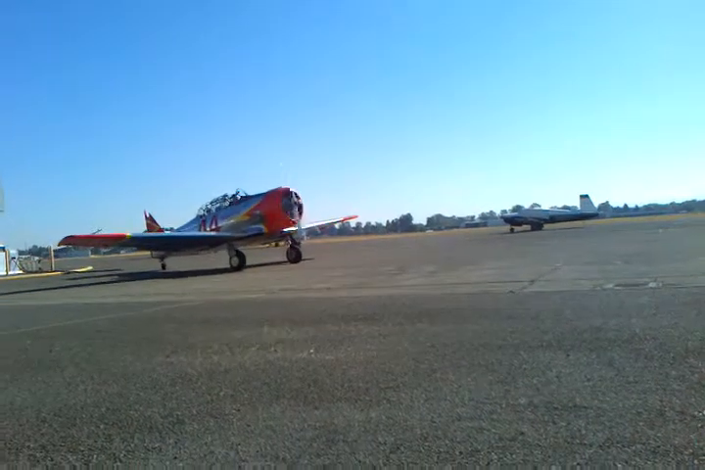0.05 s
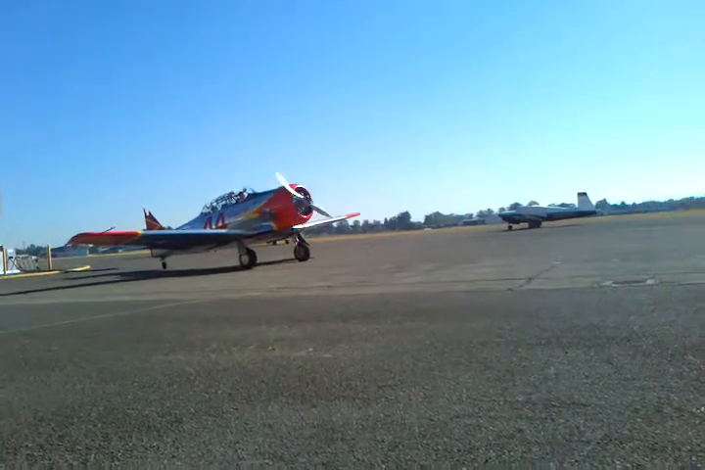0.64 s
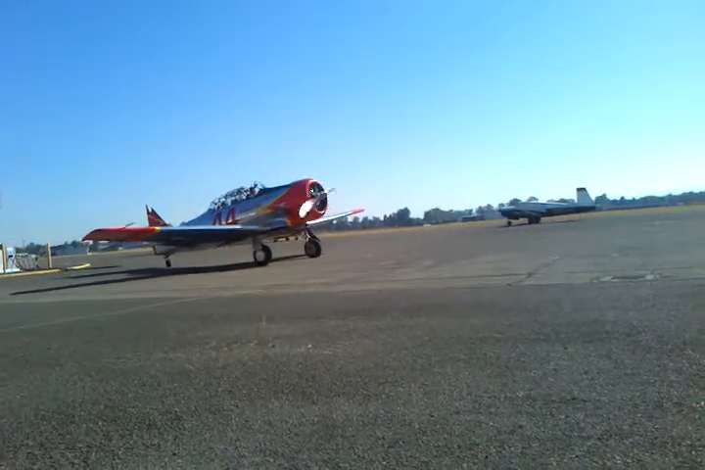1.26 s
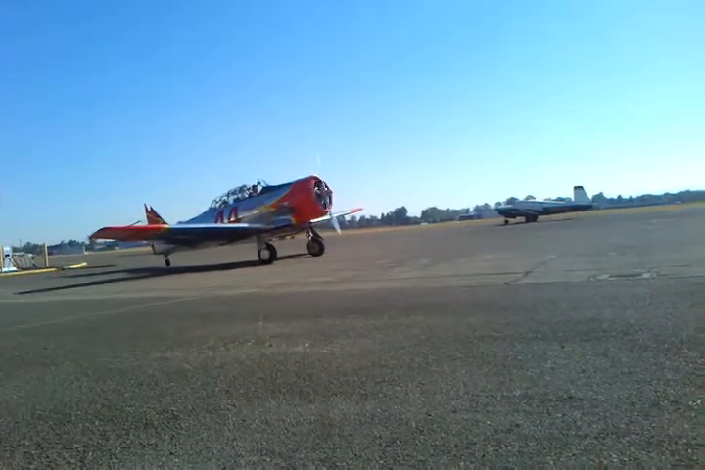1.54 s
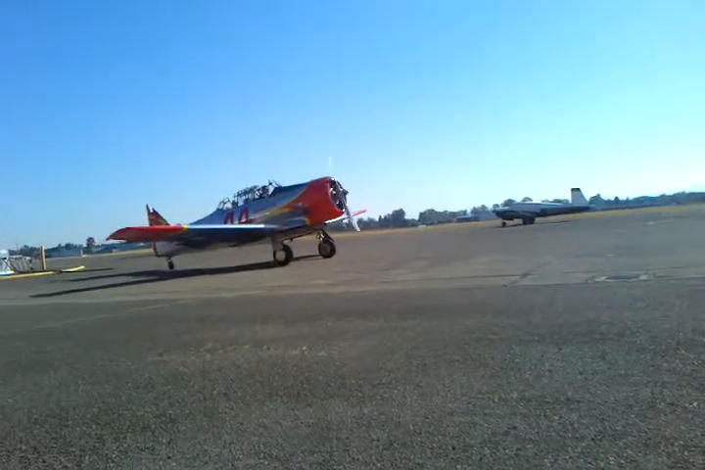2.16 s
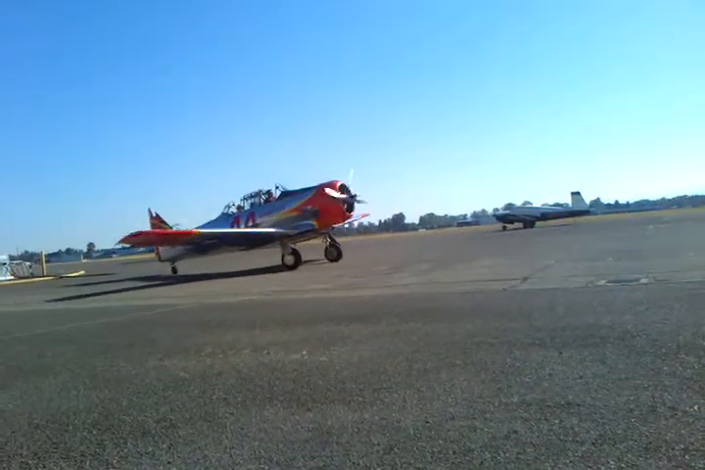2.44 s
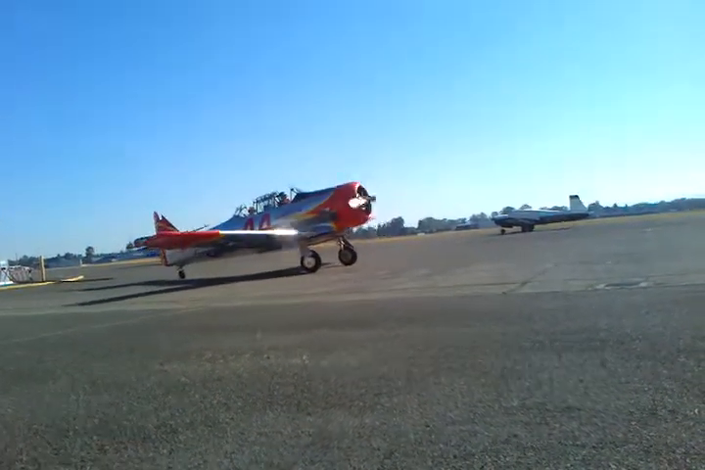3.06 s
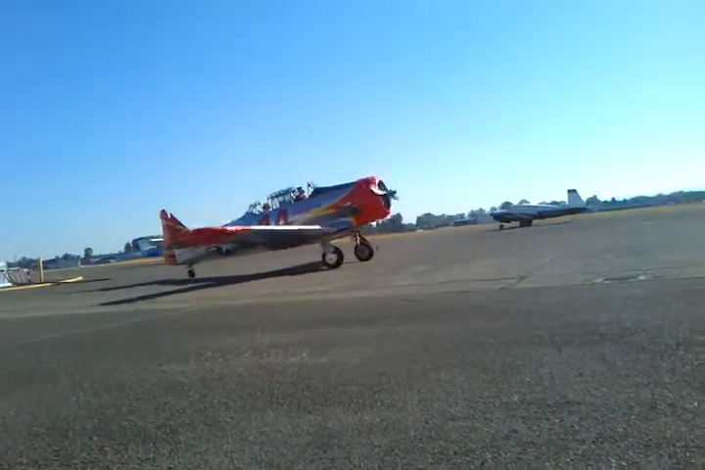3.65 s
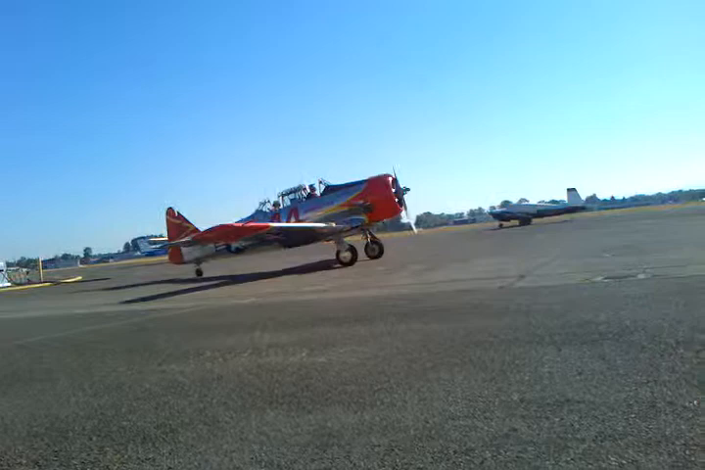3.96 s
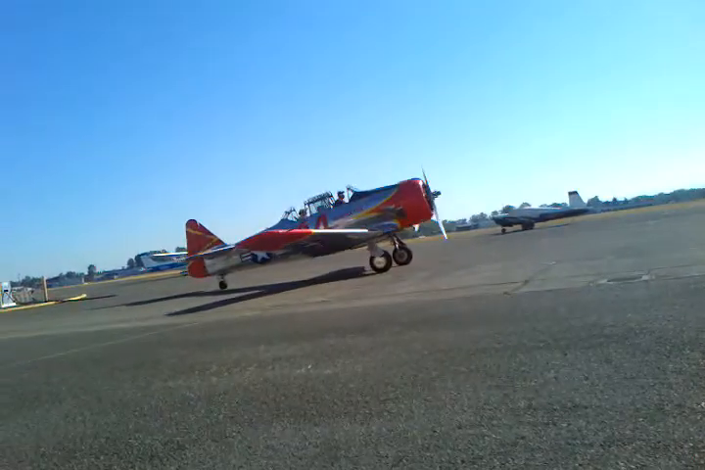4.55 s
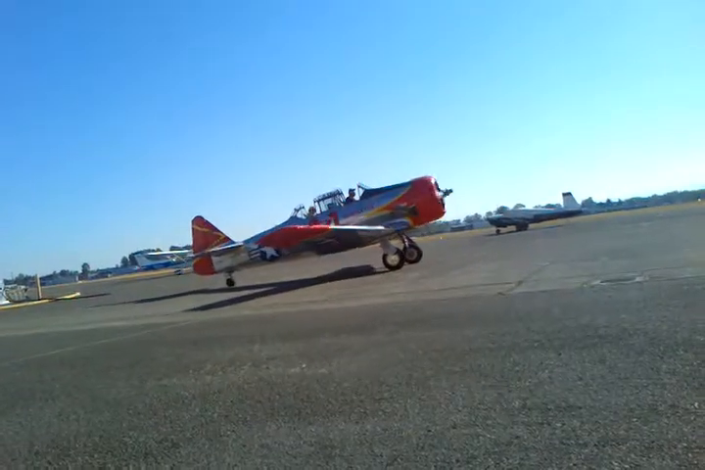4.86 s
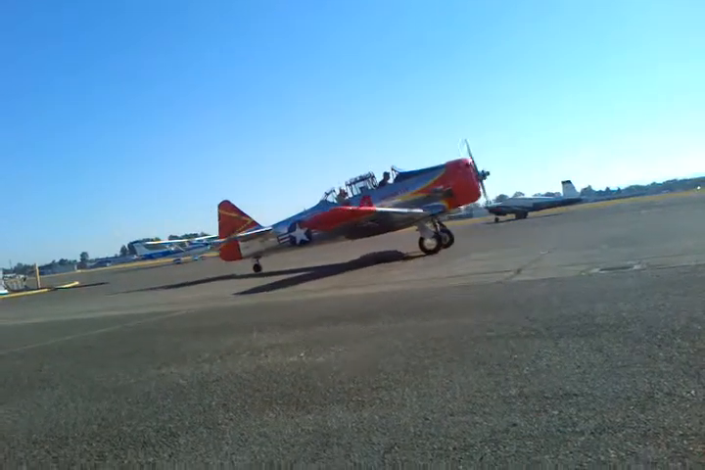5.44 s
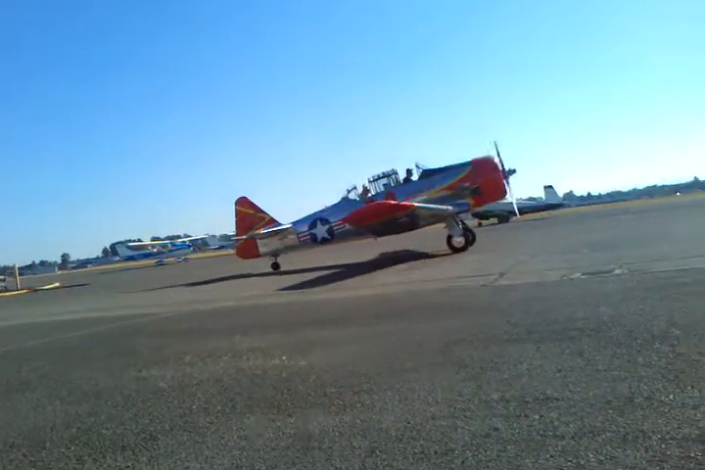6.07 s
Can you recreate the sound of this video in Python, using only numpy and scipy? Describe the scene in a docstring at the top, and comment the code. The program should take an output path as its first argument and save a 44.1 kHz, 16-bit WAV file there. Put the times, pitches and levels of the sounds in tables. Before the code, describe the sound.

The loping idle of a radial aircraft engine and a chopping propeller as a plane taxis by outdoors, under a bright hiss.

```python
"""A propeller plane taxis past on an open apron, some twenty metres away, its nine-cylinder radial idling.
At first the nose points nearly this way: the two blades swish, slap, chirp and briefly bark, while uneven
firings lope through the exhaust collector and rasp at its outlet. As the plane swings round, the blades
recede, the pipe changes colour and other valves tick through. Just past side-on the exhaust pops hardest.
A bright hiss lies on top throughout, and a hand-held recorder widens the stereo image."""
import sys
import numpy as np
from scipy import signal
from scipy.fft import rfft, irfft
from scipy.io import wavfile
from scipy.ndimage import uniform_filter1d

SR = 44100
rng = np.random.default_rng(int(sys.argv[2]) if len(sys.argv) > 2 else 0)


def store_wav(level_fs):
    """Save 16-bit WAV to argv[1]."""
    pcm = np.round(np.clip(np.atleast_2d(level_fs), -1, 1) * 32767)
    wavfile.write(sys.argv[1], SR, pcm.T.astype(np.int16))


N = 277830
TIME = np.arange(N) / SR

# One engine cycle in firing order. Each row: a cylinder's strength in dB and lag behind an even beat
# in ms as heard from the front, then the same two from the side.
CYLINDER_FIRINGS = [(-3.9, 1.2, -5.4, -0.3), (0.3, 2.7, 0.4, 1.9), (4.9, 0.7, 5.6, 1.3),
                    (5.0, -0.1, -4.6, 1.5), (-1.7, -2.2, -0.8, -2.0), (-0.2, 0.2, -2.6, 0.1),
                    (-4.8, -0.8, 0.7, 1.2), (-3.7, 0.5, 4.8, 2.1), (3.3, -0.8, 1.1, -0.2)]
# The recorder's stereo widening. Each row: frequency in Hz, left minus right in dB, phase lead of the
# left in radians, likeness of the channels from 0 to 1.
STEREO_IMAGE = [(75, -2.3, -2.39, 0.993), (160, -2.4, -1.58, 0.961), (310, -3.4, -1.27, 0.885),
                (530, -7.8, -0.65, 0.467), (800, -2.5, -0.13, 0.734), (1100, -3.2, 0.3, 0.636),
                (1300, -0.5, 0.03, 0.971), (1550, 0.0, -0.0, 1.0), (1800, -0.1, -0.02, 0.967),
                (2150, -2.2, -0.43, 0.675), (2500, -6.2, -0.85, 0.13), (2800, -1.8, -2.88, 0.35),
                (3030, -0.2, -3.08, 0.985), (3170, -0.0, -3.14, 1.0), (3340, 0.3, -3.18, 0.985),
                (3650, 2.8, -3.47, 0.692), (3950, -0.3, -5.07, 0.088), (4300, 0.7, -6.34, 0.686),
                (4700, -0.2, -6.27, 0.726), (5100, -0.2, -6.33, 0.633), (5500, -2.6, -4.99, 0.085)]


def undb(db):
    """Decibels to gain."""
    return 10 ** (np.asarray(db) / 20)


def unit(x):
    """Scale to an rms of 1."""
    return x / np.sqrt(np.mean(x ** 2))


def curve(points):
    """Join (seconds, value) points with straight lines."""
    return np.interp(TIME, *np.transpose(points))


def over_bins(table):
    """Each column of a table in frequency, joined on a log axis."""
    hz, *columns = np.transpose(table)
    bins = np.maximum(np.arange(N // 2 + 1) * SR / N, 1)
    return [np.interp(np.log(bins), np.log(hz), column) for column in columns]


def colour(x, outline):
    """Causal filter with the given (Hz, dB) outline; the result has an rms of 1."""
    cepstrum = irfft(np.log(undb(over_bins(outline)[0])), N)
    cepstrum[1:N // 2] *= 2
    cepstrum[N // 2 + 1:] = 0
    return unit(irfft(rfft(x) * np.exp(rfft(cepstrum)), N))


def band(x, low_hz, high_hz):
    """Steep band-pass."""
    return signal.sosfilt(signal.butter(4, [low_hz, high_hz], "band", fs=SR, output="sos"), x)


def resonance(x, hz, width_hz):
    """One resonance with a gain of 1 at its centre."""
    return signal.lfilter(*signal.iirpeak(hz, hz / width_hz, fs=SR), x)


def ring(x, hz, width_hz):
    """The same resonance twice over; the result has an rms of 1."""
    return unit(resonance(resonance(x, hz, width_hz), hz, width_hz))


def walk(rate):
    """Random levels held 1 / rate s and slewed; spread near 1."""
    hold = int(SR / rate)
    return unit(uniform_filter1d(rng.standard_normal(N)[np.arange(N) // hold], hold))


def strikes(times, db):
    """One impulse of the given strength at each time."""
    at = np.round(times * SR).astype(int)
    inside = (at >= 0) & (at < N)
    return np.bincount(at[inside], undb(db)[inside], N)


def fade(impulses, decay_s):
    """Each impulse becomes a dying envelope."""
    return signal.lfilter([1], [1, -np.exp(-1 / (decay_s * SR))], impulses)


def noise_pair(likeness):
    """Two noises with the given likeness (-1 to 1) at each frequency."""
    mid, side = rfft(rng.standard_normal((2, N)))
    return irfft(mid * np.sqrt(1 + likeness) + np.array([[1], [-1]]) * side * np.sqrt(1 - likeness), N)


def turbulence():
    """Stereo noise, left and right alike in some bands and unrelated in others."""
    return noise_pair(over_bins(STEREO_IMAGE)[2])


def radiated(bearing, side_db, nose_db, tail_db):
    """Gain of a source at a bearing in degrees off the nose: its side-on level, changed fore and aft."""
    ahead = np.cos(np.radians(bearing))
    return undb(side_db + nose_db * np.maximum(ahead, 0) ** 1.5 + tail_db * np.maximum(-ahead, 0))


def firings(turns, scatter_db=0.7, jitter_ms=0.06):
    """Each cylinder fires once in two turns; unequal strengths and paths make the lope, front and side."""
    count = len(CYLINDER_FIRINGS)
    beat = np.arange(int(turns[-1] / 2 * count))
    front_db, front_ms, side_db, side_ms = np.array(CYLINDER_FIRINGS)[beat % count].T
    size, late = rng.standard_normal((len(beat), 2)).T
    times = np.interp(2 * beat / count, turns, TIME)
    return [strikes(times + (lag_ms + jitter_ms * late) / 1000, db + scatter_db * size)
            for db, lag_ms in ((front_db, front_ms), (side_db, side_ms))]


def pipe(pulses, outline):
    """Firings roll round the collector and ring the pipe."""
    # Notes the collector ring holds back. Each row: pitch in Hz, width in Hz.
    held_notes = [(100, 24), (193, 47), (255.5, 9.4)]
    for hz, width_hz in held_notes:
        pulses = pulses - 2 * resonance(pulses, hz, width_hz)  # all-pass: draws the thump into a roll
    return colour(band(pulses, 50, 4000), outline)


def exhaust(front, side, bearing, crossover_deg=75.2, width_deg=54):
    """The upper notes of the pipe come forward as the outlet swings round, and the hollow notes fade."""
    # The pipe's tone from the front and from the side. Each row: frequency in Hz, level in dB.
    front_tone = [(45, -29.5), (64, -12.5), (76, -3.5), (100, -17.5), (122, -17.5), (136, 3), (155, 4.5),
                  (185, -8), (205, -1.5), (221, -5.5), (238, -8), (260, -15), (320, -15.5), (365, -24.5),
                  (408, -23), (450, -38), (700, -33.5), (2000, -61)]
    side_tone = [(45, -14), (64, -12), (76, -8.5), (100, -6), (122, -5), (136, -4.5), (155, -6), (185, -4),
                 (203, -0.5), (219, 5), (237, 3), (280, -15), (320, -2), (361, -6.5), (430, -20.5),
                 (700, -37), (2000, -68)]
    # Hollow notes over the nose. Each row: pitch in Hz, width in Hz, opening level against the pipe
    # in dB, fade time in seconds.
    hollow_notes = [(456, 42, -10.5, 0.51), (317.8, 24, -12, 3.3)]
    hollow = sum(undb(db) * np.exp(-(TIME / fade_s) ** 2) * ring(front, hz, width_hz)
                 for hz, width_hz, db, fade_s in hollow_notes)
    side_on = (1 + np.tanh((bearing - crossover_deg) / width_deg / 2)) / 2
    return (1 - side_on) * pipe(front, front_tone) + side_on * pipe(side, side_tone) + hollow


def rasp(pulses, sputter_db=2.5, steady_flow=6.4):
    """Firings puff into a steady, sputtering stream of gas."""
    # The gritty midrange of the gas. Each row: frequency in Hz, level in dB.
    tone = [(60, -57), (200, -17.5), (330, -2.5), (400, -4), (470, -4), (560, -6.5), (800, -1.5),
            (980, -4.5), (1120, -14.5), (2000, -17.5), (5000, -48.5)]
    stream = steady_flow + unit(fade(np.sign(pulses), decay_s=0.0034))
    return colour(turbulence() * stream * undb(sputter_db * walk(260)), tone)


def burble(churn_db=1.0):
    """Spent gas churns evenly at the outlet and fills the gaps between the firings."""
    # The low body of the churn. Each row: frequency in Hz, level in dB.
    tone = [(50, -20.5), (80, -10.5), (140, -1.5), (200, -2.5), (275, 3), (330, -3.5), (420, -22.5),
            (900, -44)]
    return colour(turbulence() * undb(churn_db * walk(120)), tone)


def machinery(turns, chop_db=2.2, dip_turn=0.53, flutter_db=2.08):
    """Gears, valves and churned air make a rough rush that the blades chop lightly."""
    # The broad spread of the rush. Each row: frequency in Hz, level in dB.
    tone = [(30, -9), (60, 5), (400, 3), (1800, -7.5), (2200, 3), (2600, 0), (3000, -2.5), (3500, -2),
            (4200, -4.5), (5200, -8), (9000, -26.5)]
    pulse_db = -chop_db * np.cos(4 * np.pi * (turns - dip_turn))
    return colour(turbulence() * undb(pulse_db + flutter_db * walk(150)), tone)


def whine(turns, waver_db=6.5, wander_cycles=0.073):
    """Thin gear tones follow the crankshaft and waver."""
    # Each row: cycles per crankshaft turn, level in dB.
    gear_tones = [(28, -54), (42, -56)]
    out = np.zeros(N)
    for teeth, db in gear_tones:
        mesh = np.sin(2 * np.pi * (teeth * turns + wander_cycles * walk(5)))
        out += undb(db) * unit(mesh * undb(waver_db * walk(1.87)))
    return out


def swish(turns, bearing, depth_db=2.5, uneven_db=1.0, flutter_db=1.5, peak_turn=0.4):
    """Air tears off each blade as it sweeps towards the listener; one blade is a little louder."""
    # The airy tone of the blades. Each row: frequency in Hz, level in dB.
    tone = [(400, -26.5), (1000, -15), (1150, -1.5), (1300, 1), (1600, 0), (1900, -4.5), (2400, -7),
            (3100, -15.5), (3500, -5), (5000, -22), (9000, -41)]
    lag_turns = 0.051 * (1 - np.cos(np.radians(bearing)))  # the sweep comes later side-on than head-on
    angle = 2 * np.pi * (turns - lag_turns - peak_turn)
    sweep_db = depth_db * np.cos(2 * angle) + uneven_db * np.cos(angle)
    return colour(turbulence() * undb(sweep_db + flutter_db * walk(180)), tone)


def hiss(turns, bearing, lift_db=4, throb_db=0.5, gasp_db=1.0, flicker_db=1.0, grain_db=1.17):
    """A wide, bright hiss flickers in bands and throbs with the engine, gasping once a cycle side-on."""
    # The sheen on top. Each row: frequency in Hz, level in dB.
    tone = [(2000, -20), (3300, -99), (4500, -16), (6000, -11), (7200, -5.5), (8500, -2.5), (9900, 1),
            (10700, 3), (12000, 2.5), (13000, 3.5), (14000, 0)]
    # Its fader ride. Each row: time in seconds, level in dB before the lift.
    ride = [(0, -30), (1.4, -29), (1.95, -30.5), (2.3, -29.5), (3.6, -30), (4.5, -30), (5.1, -32),
            (5.4, -31), (6.3, -31.5)]
    angle = np.pi * (turns - 1.73)
    throb = np.cos(angle) + np.cos(2 * angle)
    gasp = np.exp(16 * (np.cos(np.pi * (turns - 1.88)) - 1)) * np.sin(np.radians(bearing)) ** 4
    # a stereo-widening comb makes the hiss alternately narrow and wide up the spectrum
    comb_hz, comb_depth = 3170, 0.35
    likeness = -comb_depth * np.cos(2 * np.pi * np.arange(N // 2 + 1) * SR / N / comb_hz)
    edges_hz = [2000, 6000, 9500, 12000, 16000]
    tail_shade_db = [0, -1, -4, -5]  # the top bands dull as the tail comes round
    noise = 0
    for low_hz, high_hz, tail_db in zip(edges_hz, edges_hz[1:], tail_shade_db):
        flicker = undb(flicker_db * walk(40) + grain_db * walk(300))
        shade = radiated(bearing, 0, 0, tail_db)
        noise = noise + band(noise_pair(likeness), low_hz, high_hz) * flicker * shade
    pulsing = noise * undb(throb_db * throb + gasp_db * gasp)
    return undb(curve(ride) + lift_db) * colour(pulsing, tone)


def valves(turns, bearing, cowl_deg=79, cowl_width_deg=16, scatter_db=0.2):
    """Each valve ticks once a cycle; the cowling hides some and uncovers others as the plane turns."""
    # Each row: place in the two-turn cycle in turns, ring in Hz, level in dB from the front, from behind.
    cycle_ticks = [(0.04, 2400, -42, -33), (0.06, 3700, -38, -52), (0.43, 4900, -39, -48),
                   (0.53, 3400, -37, -46), (0.85, 3500, -34, -48), (1.11, 2500, -35, -42),
                   (1.36, 2900, -35, -39), (1.55, 3900, -35, -43), (1.73, 2750, -42, -31),
                   (1.76, 3650, -32, -46)]
    # Ticks that stand out. Each row: time in seconds, ring in Hz, level in dB.
    hard_ticks = [(0.675, 3650, -36), (1.009, 3800, -40), (3.007, 3800, -37), (3.488, 3400, -29),
                  (3.604, 3650, -29), (3.721, 3600, -25), (4.659, 2550, -25), (4.792, 2300, -23.5),
                  (6.258, 2400, -31)]
    behind = (1 + np.tanh((bearing - cowl_deg) / cowl_width_deg)) / 2
    cycle_starts = 2 * np.arange(int(turns[-1] / 2) + 1)
    blows = [(hz, strikes(np.array([s]), np.array([db]))) for s, hz, db in hard_ticks]
    for place, hz, front_db, behind_db in cycle_ticks:
        times = np.interp(cycle_starts + place, turns, TIME, right=-1)
        db = np.interp(times, TIME, front_db + (behind_db - front_db) * behind)
        blows.append((hz, strikes(times, db + scatter_db * rng.standard_normal(len(times)))))
    noise = turbulence()
    return sum(fade(hits + 1e-18, decay_s=0.0027) * ring(noise, hz, width_hz=600) for hz, hits in blows)


def slaps(turns, level_db, scatter_db=1.5, uneven_db=1.0, first_turn=0.49):
    """Each passing blade gives a short, rough slap, one blade more than the other; a few hit hard."""
    # Slaps that hit hard. Each row: time in seconds, level in dB.
    hard_slaps = [(0.028, -26), (0.169, -25), (0.428, -26), (0.658, -19), (0.832, -23)]
    # The smack of the air. Each row: frequency in Hz, level in dB.
    tone = [(200, -4.0), (480, -1.5), (850, 3.5), (1100, -7), (1600, -3), (3000, -19), (7000, -65)]
    passes = np.arange(int(2 * turns[-1]) - 1)
    times = np.interp(passes / 2 + first_turn, turns, TIME)
    db = np.interp(times, TIME, level_db) + scatter_db * rng.standard_normal(len(times))
    blows = strikes(times, db - uneven_db * (-1) ** passes) + strikes(*np.transpose(hard_slaps))
    return fade(blows, decay_s=0.0031) * colour(rng.standard_normal(N), tone)


def chirps(turns, gain, pitch_hz=1510, spread=0.0778, glide=-0.0622, width_s=0.0026):
    """Vortices shed from a blade sing for a moment on each sweep, at a new pitch every time."""
    # Sweeps that sing out. Each row: time in seconds, boost in dB.
    loud_sweeps = [(1.065, 7.5), (1.357, 4.5), (2.295, 2), (2.356, 7)]
    first_turn, jitter_s, uneven_db, scatter_db = 0.45, 0.001985, 0.5, 0.2
    passes = np.arange(int(2 * turns[-1]))
    tune, size, late = rng.standard_normal((len(passes), 3)).T
    times = np.interp(passes / 2 + first_turn, turns, TIME) + jitter_s * late
    accent_db = uneven_db * (-1) ** passes + scatter_db * size  # one blade sings louder
    for s, boost_db in loud_sweeps:
        accent_db[np.argmin(np.abs(times - s))] += boost_db
    peaks = np.interp(times, TIME, gain) * undb(accent_db)
    out = np.zeros(N)
    for centre, peak, hz in zip(times, peaks, pitch_hz * (1 + spread * tune)):
        near = slice(*np.searchsorted(TIME, [centre - 0.03, centre + 0.03]))
        age = (TIME[near] - centre) / width_s
        cycles = rng.random() + np.cumsum(hz * (1 + glide * np.tanh(age / 2))) / SR
        out[near] += peak * np.exp(-age ** 2 / 2) * np.sin(2 * np.pi * cycles)
    return out


def bark(turns, depth_db=4.5, peak_turn=0.38, loudest_s=0.55, width_s=0.48):
    """A throaty burst of air on every blade pass swells briefly while the nose points this way."""
    # The throat of the bark. Each row: frequency in Hz, level in dB.
    tone = [(350, -28), (560, -13), (650, 2), (710, -10), (780, 3), (860, -13), (970, 5), (1100, -7),
            (1600, -34)]
    bursts = turbulence() * undb(depth_db * np.cos(4 * np.pi * (turns - peak_turn)))
    swell = np.exp(-((TIME - loudest_s) / width_s) ** 2)
    return swell * colour(bursts, tone)


def pops(turns, bearing, level_db=-38.5, rise_db=7.5, outlet_deg=98, width_deg=6, scatter_db=2.5):
    """Each firing leaves the pipe with a crack, loudest while the outlet points this way."""
    # The crack at the open pipe. Each row: frequency in Hz, level in dB.
    tone = [(150, -28), (380, -2.5), (520, 2), (750, -1), (1100, -9), (1500, -13), (2500, -21), (6000, -48)]
    # Firings that pop hard. Each row: time in seconds, level in dB.
    hard_pops = [(4.237, -24), (4.978, -25), (5.182, -17), (5.765, -24), (6.257, -29)]
    lobe_db = level_db + rise_db * np.exp(-((bearing - outlet_deg) / width_deg) ** 2)
    count = len(CYLINDER_FIRINGS)
    beat = np.arange(int(turns[-1] / 2 * count))
    times = np.interp(2 * beat / count - 0.04, turns, TIME)  # just ahead of the beat
    db = np.interp(times, TIME, lobe_db) + scatter_db * rng.standard_normal(len(times))
    cracks = strikes(times, db) + strikes(*np.transpose(hard_pops))
    return fade(cracks, decay_s=0.0022) * colour(turbulence(), tone)


def widen(x):
    """The recorder's stereo widening shifts left-right balance and phase with frequency."""
    pan_db, lead, _ = over_bins(STEREO_IMAGE)
    half = undb(pan_db / 2) * np.exp(1j * lead / 2)
    return irfft(rfft(x) * np.array([half, 1 / half]), N)


def scene():
    """One crankshaft drives engine and propeller; the bearing of the plane sets their balance."""
    # The sagging idle. Each row: time in seconds, crankshaft speed in turns per minute.
    idle_rpm = [(0.0, 1061.4), (0.7, 1038.3), (1.5, 1024.0), (2.3, 1019.2), (3.0, 1019.5), (3.8, 1025.0),
                (4.6, 1021.9), (5.4, 1008.7), (6.3, 998.1)]
    turns = np.cumsum(curve(idle_rpm)) / 60 / SR - 0.036
    side_on_s, swing_deg_per_s = 4.36, 15.8
    bearing = 90 + swing_deg_per_s * (TIME - side_on_s)
    front, side = firings(turns)
    engine = (radiated(bearing, side_db=-23.5, nose_db=-2.5, tail_db=-2) * exhaust(front, side, bearing)
              + radiated(bearing, side_db=-34, nose_db=1.5, tail_db=-4) * rasp(front)
              + radiated(bearing, side_db=-34.5, nose_db=-4.5, tail_db=3.5) * machinery(turns)
              + valves(turns, bearing)
              + pops(turns, bearing)
              + radiated(bearing, side_db=-33.5, nose_db=-1, tail_db=2) * burble()
              + whine(turns))
    surge_db = 1.7 * np.exp(-((TIME - 0.65) / 0.27) ** 2)  # the propeller bites harder for a moment
    slap_db = -17 - 0.3 * bearing + surge_db  # slaps fall away as the nose swings off
    propeller = (radiated(bearing, side_db=-37, nose_db=4.5, tail_db=2) * undb(surge_db) * swish(turns, bearing)
                 + slaps(turns, slap_db)
                 + undb(-38) * bark(turns)
                 + chirps(turns, radiated(bearing, side_db=-35.5, nose_db=6.5, tail_db=-7.5)))
    pan_db = 0.3 * np.cos(np.radians(bearing))  # the plane drifts slightly right as it rolls on
    plane = widen(engine + propeller) * undb(np.array([pan_db, -pan_db]) / 2)
    return plane + hiss(turns, bearing)


def record(dry, rumble_hz=15, top_hz=14050):
    """The recorder drops the deepest rumble and cuts the top steeply."""
    thinned = signal.sosfilt(signal.butter(1, rumble_hz, "high", fs=SR, output="sos"), dry)
    return signal.sosfilt(signal.ellip(12, 0.1, 80, top_hz, fs=SR, output="sos"), thinned)


dry = scene()
out = record(dry)
store_wav(out)
```